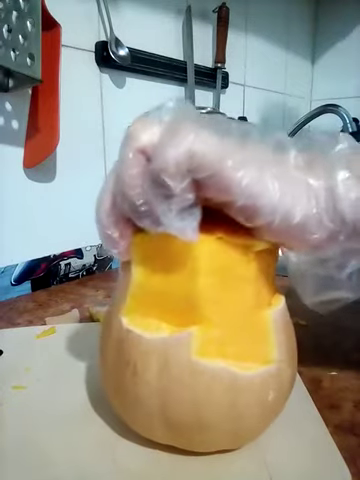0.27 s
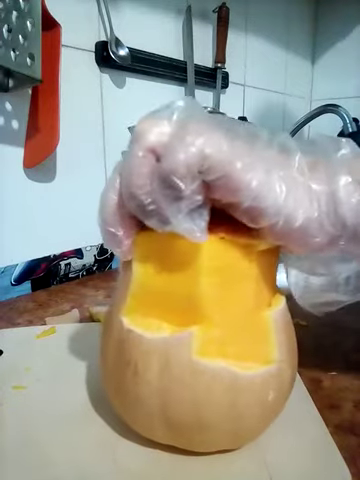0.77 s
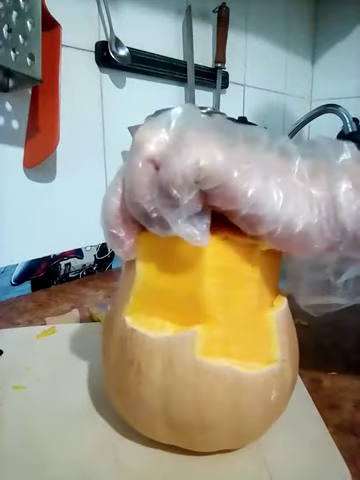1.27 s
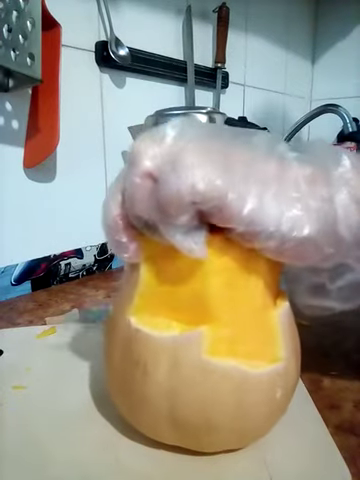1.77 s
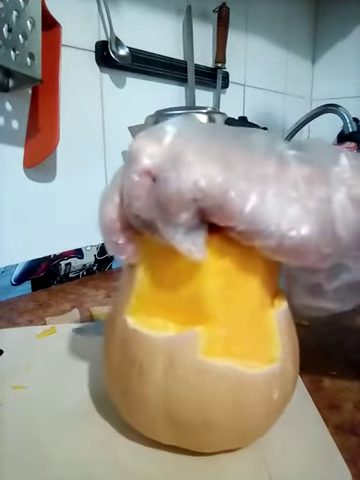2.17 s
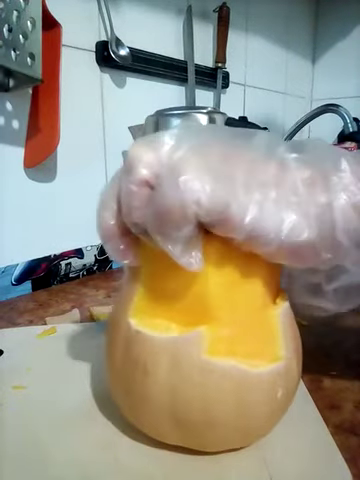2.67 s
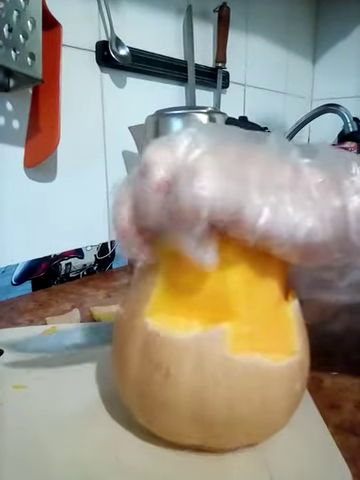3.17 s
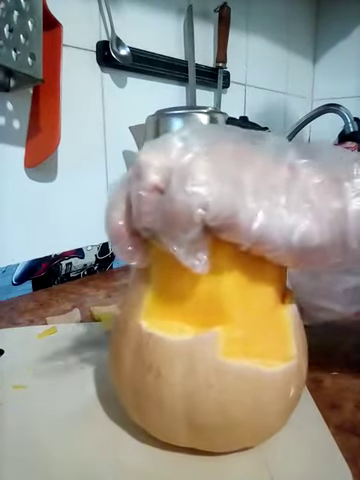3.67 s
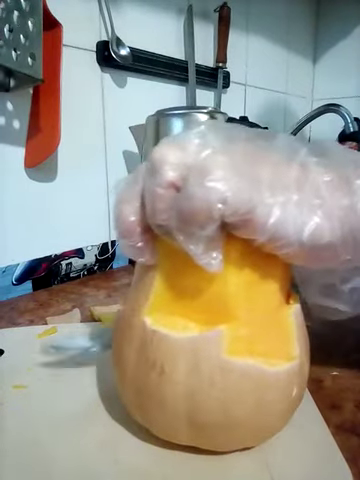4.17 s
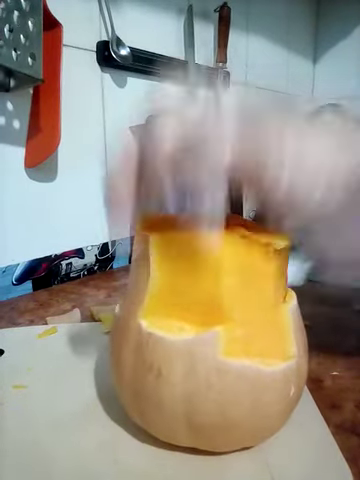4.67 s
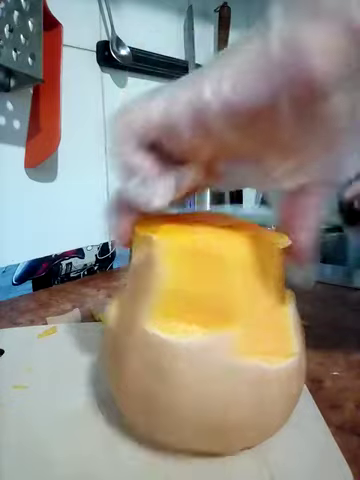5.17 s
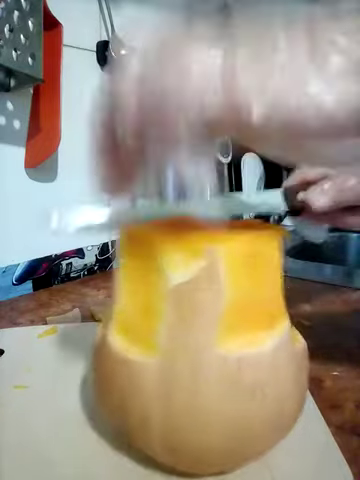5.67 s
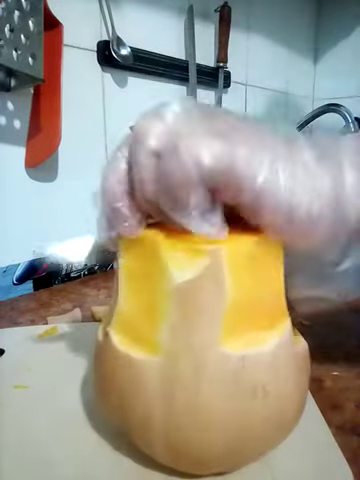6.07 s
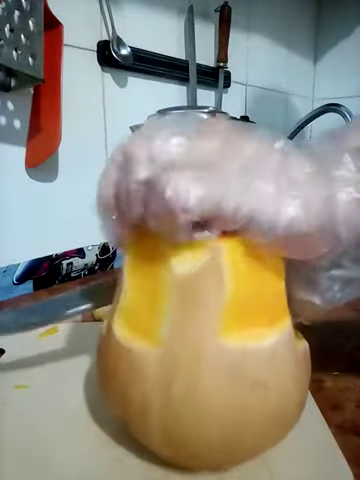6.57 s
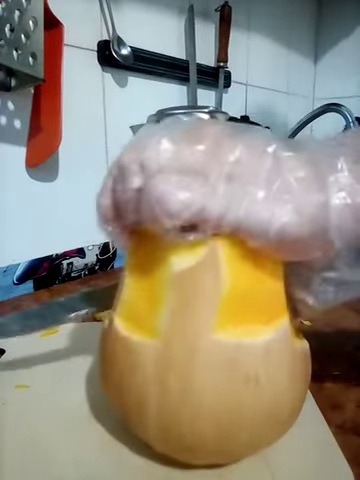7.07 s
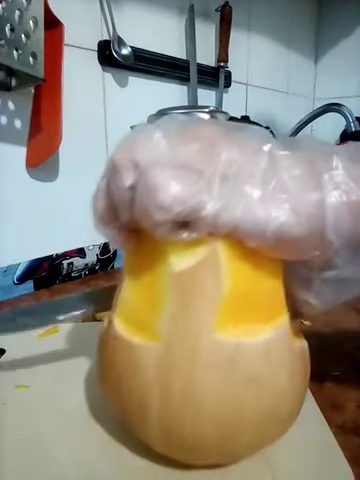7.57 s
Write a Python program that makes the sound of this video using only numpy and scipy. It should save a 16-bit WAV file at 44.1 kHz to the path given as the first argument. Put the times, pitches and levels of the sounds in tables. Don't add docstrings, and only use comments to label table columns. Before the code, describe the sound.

A quiet start of faint film crackle gives way to paring: dry rasps, hollow rubbing and bright plastic pops. Four snaps of tough peel punctuate the first half, the last two sharp and loud with a short tiled echo. Then glove rustle swells, with lighter scraping, small squeaks and soft counter bumps. Close, mid-bright phone sound, little deep bass, faint fridge hum beneath.

```python
import sys
import numpy as np
from scipy import signal
from scipy.fft import rfft, irfft, next_fast_len
from scipy.io import wavfile
from scipy.ndimage import uniform_filter1d, map_coordinates

SR = 44100
rng = np.random.default_rng(int(sys.argv[2]) if len(sys.argv) > 2 else 0)


def gain_from_db(level_db):
    decades = np.asarray(level_db, float) / 20
    return 10 ** decades


def output_pcm(signal):
    pcm = np.clip(np.atleast_2d(signal).T, -1, 1) * 32767
    wavfile.write(sys.argv[1], SR, np.round(pcm).astype(np.int16))


N = 347067


def unit(x):
    return x / np.sqrt(np.mean(x ** 2) + 1e-20)


def along(points, hz):
    f, v = np.transpose(points)
    return np.interp(np.log(hz + 1), np.log(f + 1), v)


def wobble(rate_hz):
    knots = rng.standard_normal(int(N * rate_hz / SR) + 4)
    return map_coordinates(knots, [np.arange(N) * rate_hz / SR])


def filtered(x, response):
    m = next_fast_len(len(x) + 8192)
    return irfft(rfft(x, m) * response(np.fft.rfftfreq(m, 1 / SR)), m)[:len(x)]


def causal(points):
    def response(hz):
        cepstrum = irfft(np.log(gain_from_db(along(points, hz)) + 1e-6))
        half = len(cepstrum) // 2
        cepstrum[1:half] *= 2
        cepstrum[half + 1:] = 0
        return np.exp(rfft(cepstrum))
    return response


def body(peaks):
    def response(f):
        total = 0
        for k, (hz, width_hz, db) in enumerate(peaks):
            loss = 1j * f * width_hz
            total = total + (-1) ** k * gain_from_db(db) * loss / (hz * hz - f * f + loss)
        return total
    return response


def ring(hz, t60_s, t, attack_s, drift_rad=0):
    return np.sin(2 * np.pi * hz * t + drift_rad) * gain_from_db(-60 * t / t60_s) * (1 - np.exp(-t / attack_s))


def grit(count, spread_db, life_s, clump_db, smooth_db):
    at, size = rng.random((count, 2)).T
    size = gain_from_db(-spread_db * np.log(size + 1 / 25))
    slips = np.bincount((at * N).astype(int), size, N)
    puffs = signal.lfilter([1], [1, -np.exp(-1 / (life_s * SR))], slips)
    return gain_from_db(clump_db * wobble(45)) * (unit(puffs) + gain_from_db(smooth_db)) * rng.standard_normal(N)


def patchy(x, focus=lambda hz, s: 1):
    hz, s, z = signal.stft(x, SR, nperseg=512)
    field = uniform_filter1d(rng.standard_normal(z.shape), size=6, axis=0)
    field = uniform_filter1d(field, size=9, axis=1)
    streaks = uniform_filter1d(rng.standard_normal(z.shape), size=14, axis=1)
    patch_db = 2.2 / (1 + (hz[:, None] / 8000) ** 4)
    gain = gain_from_db(patch_db * unit(field) + 2.2 * unit(streaks))
    return signal.istft(z * gain * focus(hz[:, None], s), nperseg=512)[1][:N]


def effort(s, rise_s, hold_s, db, fall_db_per_s):
    t = np.arange(N // 64 + 2) * 64 / SR - np.asarray(s)[:, None]
    early = np.minimum(t, 0) / np.reshape(rise_s, (-1, 1))
    late = np.maximum(t - hold_s[:, None], 0)
    power = gain_from_db(2 * (db[:, None] + 20 * early - fall_db_per_s * late)).sum(axis=0)
    return np.sqrt(np.interp(np.arange(N) / 64, np.arange(len(power)), power))


def add(track, s, sound):
    part = track[round(s * SR):][:len(sound)]
    part += sound[:len(part)]


# (time of full strength [s], rise [s], hold [s], level [dB])
SQUEEZES = [(0, .01, 0.05, -61), (0.188, 0.36, 0.074, -66), (0.427, 0.0089, 0.14, -67),
            (1.118, 0.083, 0.087, -54.5), (1.258, .006, 0.066, -54.5), (1.396, 0.039, 0.087, -53),
            (1.553, 0.038, 0.13, -52.5), (1.777, 0.036, 0.19, -57), (2.114, 0.084, 0.11, -51.5),
            (2.321, 0.0051, 0.032, -48.5), (2.457, 0.1, 0.051, -47), (2.667, 0.061, 0.02, -44),
            (2.888, 0.03, 0.11, -56.5), (3.073, 0.072, 0.1, -58), (3.234, .005, 0.057, -59),
            (3.55, 0.17, 0.22, -55.5), (3.882, 0.043, 0.2, -59.5), (4.279, .003, 0.022, -51),
            (4.547, 0.17, 0.021, -42.5), (4.926, 0.19, 0.015, -46), (5.03, 0.074, 0.12, -52.5),
            (5.194, .006, 0.09, -51.5), (5.39, .15, 0.23, -51.5), (5.638, .1, 0.14, -61),
            (5.823, 0.026, 0.3, -50), (6.181, 0.074, 0.11, -44.5), (6.414, 0.14, 0.03, -46.5),
            (6.514, 0.051, 0.012, -40), (6.687, 0.15, 0.026, -48.5), (6.74, .005, 0.023, -55.5),
            (6.836, 0.061, 0.066, -53), (7.022, 0.074, 0.18, -49), (7.318, 0.064, 0.56, -56),
            (7.579, 0.04, 0.026, -49), (7.643, .03, 0.091, -63), (7.782, .02, 0.027, -59.5)]


def hand_effort():
    return effort(*np.transpose(SQUEEZES), fall_db_per_s=175) + gain_from_db(-78)


# (frequency [Hz], density [dB per Hz])
GLOVE_COLOUR = [(1760, -32.5), (3000, -9.5), (4000, -11), (5710, 1.5), (6410, 3.5), (6820, -1.5),
                (6960, -3.5), (8200, -20.5), (14500, -30.5), (15400, -44)]
# (frequency [Hz], density [dB per Hz])
TICK_COLOUR = [(1500, -21), (3500, -11.5), (6000, -1.5), (7000, -2.5), (8200, -21), (11000, -29),
               (15400, -38)]


def glove(hand):
    slips = grit(count=2500, spread_db=5.5, life_s=0.00033, clump_db=1.5, smooth_db=7.0)
    rustle = filtered(patchy(slips), causal(GLOVE_COLOUR))
    ticks = grit(count=900, spread_db=1.8, life_s=0.0005, clump_db=1, smooth_db=-40)
    ticks = filtered(ticks, causal(TICK_COLOUR))
    return hand * (unit(rustle) + gain_from_db(-15) * unit(ticks))


# (time [s], peak [dB], pitch [Hz])
CREASES = [(0.1028, -27, 6750), (0.2194, -35.5, 6750), (0.245, -42, 6000), (0.4294, -33.5, 5460),
           (0.5367, -36, 6400), (0.9585, -44, 710), (1.2823, -23.5, 6470), (1.3598, -29, 6190),
           (1.5564, -26, 3300), (1.5928, -25, 3380), (1.768, -29, 5800), (1.8552, -41, 6060),
           (2.1106, -25, 5000), (2.4743, -32, 6430), (2.5885, -33, 5910), (2.6434, -39, 5820),
           (2.8823, -35, 6230), (2.97, -30.5, 6250), (3.241, -40, 6240), (3.6546, -50, 6660),
           (3.7239, -41, 6260), (4.1048, -38, 5630), (4.2777, -36, 4900), (4.9174, -21, 6200),
           (5.1314, -30, 6270), (5.218, -27, 6120), (5.4889, -32, 6160), (6.0766, -23, 6130),
           (6.3639, -29, 5800), (6.4777, -31, 6380), (6.6757, -26, 5640), (7.0254, -32, 5760),
           (7.2197, -24, 5700), (7.7283, -31, 5150), (4.358, -30, 620), (4.388, -16.5, 900),
           (4.459, -25, 840), (1.3125, -31, 3000), (1.146, -23.5, 6300), (1.248, -27, 6200),
           (1.265, -25, 6230), (1.312, -33.5, 1650), (1.392, -42, 5700), (1.4715, -30, 1650),
           (1.5416, -24, 5540), (1.556, -21, 5400), (1.5932, -17, 6100), (1.6452, -23.5, 5770),
           (2.3225, -27, 4420), (2.607, -26, 5660), (3.217, -29.5, 6340), (3.871, -35, 6600),
           (5.197, -27, 6200), (5.238, -22, 6000), (5.8202, -24.5, 6660), (6.3096, -25, 5570),
           (6.4063, -19, 6330), (6.73, -21, 6100), (7.003, -26, 6600), (7.121, -19, 6400),
           (7.198, -20, 6340), (7.4328, -35, 573), (7.7304, -35.5, 1900),
           (.074, -52, 4200), (.1028, -46, 3500), (.184, -47, 3500), (.2185, -53, 3100),
             (.245, -45, 3300), (.9585, -48, 2800), (.959, -47, 5500), (1.265, -37, 3400),
             (1.411, -37, 1300), (1.473, -38, 3300), (1.545, -37, 1000), (1.593, -33, 1500),
             (1.646, -31, 3400), (1.66, -38.5, 3200), (1.767, -34, 3300), (3.259, -34, 800),
             (4.279, -40, 3730), (4.28, -43, 1797), (6.401, -32, 3000), (6.86, -44, 1500),
             (7.685, -33, 1270), (7.73, -37.5, 690), (7.73, -40, 3200)]
# (frequency [Hz], gain [dB])
PORT = [(7000, 5), (8200, -18), (15500, -25.5)]


def creases():
    out, t = np.zeros(N), np.arange(1500) / SR
    for s, db, hz in CREASES:
        t60_s = 0.023 + 2.8 / hz
        spit = gain_from_db(-60 * t / t60_s) * rng.standard_normal(len(t))
        spit[0] = 7.5
        fold = body([(hz, 0.4 * hz, 0)])
        pop = filtered(spit, lambda f: fold(f) ** 2 * causal(PORT)(f))
        add(out, s, gain_from_db(db - 9.5) * pop / abs(pop).max())
    return out


# (time [s], treble peak [dB], pitch [Hz])
SPITS = [(0.0732, -64, 9260), (0.1022, -59, 7850), (0.1695, -66, 8370), (1.1832, -56, 9360),
         (1.2471, -54, 7820), (1.3982, -55, 8410), (1.5918, -51, 8660), (1.6302, -54, 8050),
         (1.7973, -59, 7800), (2.1071, -49, 8710), (2.3221, -52, 8790), (2.4638, -50, 10900),
         (3.1916, -54, 7800), (3.2161, -63, 7800), (3.2405, -59, 8850), (3.49, -54, 8250),
         (3.6546, -44, 8770), (3.682, -54, 8770), (3.7454, -60, 7850), (4.9, -47, 8610),
         (5.0744, -54, 7830), (5.8212, -47, 7820), (6.3071, -52, 8210), (6.4009, -51, 7810),
         (6.8199, -52, 8310), (7.002, -56, 8000), (7.1112, -58, 7870), (7.5911, -52, 8090)]
# (frequency [Hz], density [dB per Hz])
SPIT_COLOUR = [(800, -26), (3000, -5), (6000, 5), (7500, -1.5), (9000, 5.5), (12000, -9.5), (15400, -16)]


def spits():
    out, t = np.zeros(N), np.arange(800) / SR
    for s, db, hz in SPITS:
        puff = gain_from_db(-60 * t / 0.011) * rng.standard_normal(len(t))
        bump = body([(hz, 900, 0)])
        tick = filtered(puff, lambda f: causal(SPIT_COLOUR)(f) * (1 + bump(f)))
        add(out, s, gain_from_db(db + 1) * tick / abs(tick).max())
    return out


CUT_RISE_S, CUT_FALL_DB_PER_S = 0.043, 210
# (time [s], hold [s], rasp [dB], flesh over rasp [dB], pitch of rubbed hollow [Hz])
CUTS = [(0.434, 0.004, -80, 11, 450), (1.014, 0.33, -59.5, -0.5, 1500), (1.363, 0.14, -65, -7, 1540),
        (1.554, 0.054, -53, -14, 1530), (1.664, 0.25, -64, 2, 744), (1.898, 0.017, -44.5, 1.5, 1167),
        (2.078, 0.15, -53, -8.5, 1484), (2.303, 0.02, -56, -6.5, 1105), (2.494, 0.032, -56, -2, 1250),
        (2.653, 0.022, -56.5, -2.5, 1300), (2.802, 0.075, -73, 8.5, 1000), (3.108, 0.023, -66, 4, 1510),
        (3.89, 0.11, -62, -3.5, 830), (4.47, 0.12, -50.5, -12, 766), (4.902, 0.038, -53.5, -19, 790),
        (5.0, 0.77, -71.5, -8.5, 575), (5.886, 0.14, -57.5, 2.5, 1290), (6.067, 0.17, -50.5, -7, 1290),
        (6.378, .02, -62.5, -3.5, 1310), (6.52, 0.017, -52.5, -16, 1220), (6.68, 0.25, -73, 6.5, 1150),
        (7.028, 0.15, -59.5, -0.5, 1260), (7.406, 0.045, -62.5, -0.5, 706), (7.6, 0.19, -68, 1.5, 1980)]
# (frequency [Hz], level [dB])
RASP_COLOUR = [(1200, -13.5), (1900, -6.5), (2150, -1.5), (2550, -5), (3250, 0.5), (3900, 0.5),
               (4400, -2.5), (5500, 2.5), (8000, -25.5), (15500, -55)]
# (frequency [Hz], width [Hz], level [dB])
BLADE_MODES = [(1290, 70, -12), (1620, 80, -8), (2550, 77, -5.5), (3480, 76, -12)]


def blade_rasp(hand):
    s, hold_s, db, _, _ = np.transpose(CUTS)
    strength = effort(s, CUT_RISE_S, hold_s, db, CUT_FALL_DB_PER_S) + gain_from_db(-20) * hand
    slips = grit(count=2000, spread_db=3, life_s=0.0009, clump_db=1, smooth_db=9)
    rasp = filtered(patchy(slips), causal(RASP_COLOUR))
    rasp = filtered(rasp, lambda hz: 1 + sum(body([mode])(hz) for mode in BLADE_MODES))
    return strength * unit(rasp)


# (frequency [Hz], width [Hz], level [dB])
FLESH_MODES = [(452, 75, 3.5), (692, 180, 2.5), (920, 200, 2.5), (1237, 146, 4.5), (1577, 440, 2),
               (2210, 890, -3.5)]


def flesh_rub(hand):
    s, hold_s, db, depth_db, pitch_hz = np.transpose(CUTS)
    strength = effort(s, CUT_RISE_S, hold_s, db + depth_db, CUT_FALL_DB_PER_S) + gain_from_db(-17) * hand
    catch = np.clip(1 + wobble(14), 0, 2.5)

    def hollow(hz, t):
        current = np.maximum(np.searchsorted(s - CUT_RISE_S, t) - 1, 0)
        caught = np.interp(t * SR, np.arange(N), catch)
        return 1 + 0.45 * caught / (1 + ((hz - pitch_hz[current]) / 90) ** 2)

    slips = grit(count=1200, spread_db=0.5, life_s=0.0021, clump_db=4.0, smooth_db=16.5)
    return strength * unit(filtered(patchy(slips, hollow), body(FLESH_MODES)))


# (time [s], hold [s], level [dB], start pitch [Hz], end pitch [Hz])
SINGS = [(1.315, 0.034, -61, 1600, 1700), (1.425, 0.021, -59, 1600, 1600),
         (1.477, 0.032, -61.5, 1750, 1720), (1.546, 0.013, -53.5, 1500, 1450),
         (1.647, .05, -60.5, 1620, 1680), (2.657, 0.045, -58, 1500, 1400), (2.739, .15, -68, 1300, 880),
         (2.696, 0.075, -63, 5600, 5500), (3.119, 0.04, -66, 1400, 1500), (3.129, 0.038, -67, 1680, 1550),
         (3.547, 0.034, -67, 1850, 1850), (5.43, .2, -69, 3050, 3100), (6.507, 0.022, -58, 1303, 1280),
         (6.672, 0.056, -64, 1260, 1230), (6.69, 0.058, -64, 3500, 3200), (6.896, 0.024, -62, 500, 460),
         (7.038, 0.17, -68, 1310, 1370), (7.118, 0.065, -63, 3480, 3200), (7.356, 0.075, -64, 950, 1020),
         (7.48, .035, -65, 2550, 2440), (7.65, .06, -63, 1300, 1400), (7.739, .04, -72, 600, 600)]


def squeaks():
    out, t = np.zeros(N), np.arange(N) / SR
    blur_rad, flutter = 1.6 * wobble(160), gain_from_db(3 * wobble(40))
    for s, hold_s, db, hz, end_hz in SINGS:
        turns = np.cumsum(np.interp(t, [s, s + hold_s], [hz, end_hz])) / SR
        swell = effort([s], 0.024, np.array([hold_s]), np.array([db + 2.5]), CUT_FALL_DB_PER_S * 2)
        out += swell * np.sin(2 * np.pi * turns + blur_rad)
    return flutter * out


# (frequency [Hz], t60 [s])
TILES = [(150, 0.56), (1000, 0.44), (5000, 0.44), (12000, 0.039)]


def room(x):
    hz, t, z = signal.stft(rng.standard_normal(SR * 3 // 4), SR, nperseg=256)
    tail = signal.istft(z * gain_from_db(-60 * t / along(TILES, hz)[:, None]), SR, nperseg=256)[1]
    tail *= 1 - np.exp(-np.arange(len(tail)) / SR / 0.0094)
    return signal.fftconvolve(x, tail / np.linalg.norm(tail))


# (time [s], tear [dB], tear length [s], ring [dB], rise [s], room [dB])
SNAPS = [
    (1.009, -46, 0.12, -23, 0.0059, -0.5),
    (1.893, -28.5, 0.096, -21, 0.00084, -10),
    (3.274, -19, 0.33, -18.5, 0.00084, -11.5),
    (4.3, -19, 0.4, -22, 0.00094, -10),
]
SNAP_HOLD_S = [0.0045, 0.0013, 0.039, 0.0037]
TREBLE_HOLD_S = [.05, .05, 0.13, .07]
# (frequency [Hz], density [dB per Hz])
SNAP_COLOURS = [
    [(180, -41), (300, -11), (756, -34), (1180, -9), (1280, -30), (1910, 2), (2360, -3), (3870, -11),
     (4800, -22), (5660, 3), (8010, -38), (15500, -56)],
    [(180, -26), (300, 3.5), (1020, 9.5), (1180, 15), (1350, 8.5), (2690, 13), (4800, -4), (6680, -16),
     (15500, -82)],
    [(120, -62), (200, -35), (400, -21), (715, -17.5), (1050, -15), (1300, -14.5), (1540, -17), (4260, -12),
     (5910, 1.5), (8050, -23.5), (15500, -44)],
    [(150, -45), (200, -10), (240, -8), (380, -14), (600, -11), (850, -16.5), (1300, -15), (1950, -8),
     (2130, -9), (2450, -18.5), (3120, -9.5), (3600, -16.5), (4150, -8), (4800, -16.5), (5800, -6.5),
     (8200, -32.5), (11800, -53), (12300, -65), (14500, -59), (15500, -87)],
]
# (frequency [Hz], level [dB], t60 [s])
SNAP_MODES = [
    [(1900, 2.5, 0.024), (2170, -21, 0.096), (5640, 1, 0.022), (4140, -11, 0.039), (3830, -21, 0.12),
     (3050, -19, .06), (1920, -19, 0.16), (5670, -20.5, .2), (4600, -27.5, 0.1), (1250, -26, 0.063)],
    [(733, 10, 0.015), (1094, -7, 0.022), (2130, 1, 0.0099), (3480, 1, 0.0089), (4200, -8, 0.012),
     (5000, -12, 0.013), (1000, 0, 0.029)],
    [(608, -1, 0.07), (1000, -1, 0.043), (412, -20, 0.015), (800, -10, 0.037), (5050, -10, .2),
     (5180, -8, 0.26), (5400, -17, 0.22), (5450, -12, 0.3), (6030, -3, 0.32), (6340, -7.5, 0.31),
     (6250, -6.5, 0.22), (309, -14, 0.044)],
    [(583, 3, 0.03), (686, 10.5, 0.033), (994, 2.5, 0.11), (1857, -12.5, 0.11), (3220, 4, 0.032),
     (4080, 8, 0.036), (5330, 8.5, 0.016), (545, -12, 0.57), (680, -15, 0.68), (450, -22, 0.051),
     (1500, -11, 0.48), (2100, -16, 0.45), (4030, -6, 0.27), (5960, -11, 0.3)],
]


def snaps():
    out, t = np.zeros(N), np.arange(SR // 2) / SR
    events = zip(SNAPS, SNAP_HOLD_S, TREBLE_HOLD_S, SNAP_COLOURS, SNAP_MODES)
    for (s, db, length_s, ring_db, rise_s, room_db), hold_s, fine_s, colour, modes in events:
        noise = gain_from_db(wobble(250)[:len(t)]) * rng.standard_normal(len(t))
        fibres = unit(filtered(noise, causal(colour)))
        fine = filtered(fibres, lambda hz: 1 / (1 + (8000 / (hz + 1)) ** 12))
        fibres = fibres - fine * (1 - gain_from_db(-60 * np.maximum(t - fine_s, 0) / 0.2))
        fall = (np.maximum(t - hold_s, 0) / length_s) ** 1.023
        tear = fibres * gain_from_db(db - 60 * fall) * (1 - np.exp(-t / rise_s))
        walk = np.cumsum(rng.standard_normal((len(modes), len(t))), axis=1) * 0.6 / np.sqrt(0.012 * SR)
        walk = uniform_filter1d(walk, size=300, axis=1)
        knock = np.zeros(len(t))
        for (hz, level_db, t60_s), drift_rad in zip(modes, walk):
            knock += gain_from_db(ring_db + level_db) * ring(hz, t60_s, t, rise_s, drift_rad)
        add(out, s, tear + knock)
        add(out, s, gain_from_db(room_db) * room(tear + 0.23 * knock))
    return out


# (time [s], peak [dB], pitch [Hz], t60 [s], deep counter mode [dB])
THUDS = [(0.434, -34, 158, 0.07, 3), (1.021, -40, 179, 0.12, -13), (1.642, -41, 153.6, 0.17, -20),
         (1.945, -28, 152, 0.073, -21), (2.163, -43, 141, 0.13, -13), (2.479, -39, 255, 0.24, -19),
         (2.492, -24, 147.5, 0.15, -18), (3.103, -40.5, 102, 0.17, 8), (3.276, -18, 246, 0.061, -36),
         (3.873, -24, 174, 0.11, -5), (4.304, -9, 242, 0.096, -48), (4.482, -38, 247.6, 0.44, -26),
         (5.509, -45, 187, 0.13, -12), (6.531, -39, 152, 0.097, 2), (7.106, -36, 179, 0.15, 7),
         (7.265, -38, 165.2, 0.26, -7), (7.661, -37, 98, 0.32, 0), (7.82, -32.5, 164, 0.13, -9)]


def thuds():
    out, t = np.zeros(N), np.arange(SR // 2) / SR
    for s, db, hz, t60_s, deep_db in THUDS:
        deep = 0.48 * ring(97, t60_s, t, 0.0074) + ring(58, 2.0 * t60_s, t, 0.0075)
        top = ring(hz, t60_s, t, 0.0019) + 0.21 * ring(2.1 * hz, 0.5 * t60_s, t, 0.0014)
        add(out, s, gain_from_db(db - 7.0) * (top + gain_from_db(deep_db) * deep))
    return out


# (time [s], hold [s], level [dB])
ROCKS = [(0.448, 0.044, -62), (0.996, 0.14, -59), (1.194, 0.37, -65), (1.65, .03, -61), (1.912, 0.041, -42),
         (2.164, 0.087, -50), (2.33, 0.048, -60.5), (2.498, 0.0093, -36.5), (2.707, 0.038, -55.5),
         (3.109, 0.025, -54), (3.28, 0.029, -42), (3.891, 0.017, -43), (4.288, 0.17, -55),
         (4.892, 0.49, -72), (5.518, 0.041, -53), (5.62, 0.034, -48), (5.73, 0.456, -59.5),
         (6.372, 0.042, -60.5), (6.53, 0.2, -56), (6.884, 0.027, -58), (7.072, 0.13, -54.5),
         (7.272, 0.068, -58.5), (7.432, 0.048, -61.5), (7.62, 0.12, -51.5), (7.832, .05, -48)]
# (frequency [Hz], width [Hz], level [dB])
COUNTER_MODES = [(52.9, 27, 0), (98.4, 22.5, 2), (164, 48, 2), (268, 160, -6)]


def counter_rumble():
    s, hold_s, db = np.transpose(ROCKS)
    rocking = effort(s, 0.024, hold_s, db, fall_db_per_s=212)
    slips = grit(count=400, spread_db=0, life_s=0.0042, clump_db=2.5, smooth_db=7)
    rumble = filtered(slips, body(COUNTER_MODES))
    rumble = filtered(rumble, lambda hz: 1 / (1 + 1j * hz / 350) ** 2)
    return rocking * unit(rumble)


# (frequency [Hz], density [dB per Hz])
AIR_COLOUR = [(15, -82), (25, -37), (69, -14), (79, -30), (101, -2), (126, -22), (253, -20), (378, -21),
              (421, -19.5), (537, -25.5), (997, -30.5), (6050, -39), (8130, -47.5), (15500, -52)]
# (frequency [Hz], level [dB rms])
HUM = [(96.9, -79), (150.7, -77.5), (306.8, -83), (457.6, -85)]
# (frequency [Hz], level [dB], t60 [s])
TAP = [(1790, -70.5, 1.6), (3050, -63, 0.15)]


def kitchen():
    t = np.arange(N) / SR
    air = unit(filtered(rng.standard_normal(N), lambda hz: gain_from_db(along(AIR_COLOUR, hz))))
    out = gain_from_db(-66 + 0.21 * wobble(0.7)) * air
    for hz, db in HUM:
        out += gain_from_db(db + 5 + 3 * wobble(8)) * np.sin(2 * np.pi * hz * t + 0.8 * wobble(9))
    for hz, db, t60_s in TAP:
        out += gain_from_db(db + 1.5 * wobble(25)) * ring(hz, t60_s, t, 0.001)
    return out


def scene():
    hand = hand_effort()
    near = glove(hand) + blade_rasp(hand) + flesh_rub(hand) + creases() + squeaks()
    near_room = gain_from_db(-13.0) * room(near)[:N]
    return (near + near_room + spits() + snaps() + thuds() + counter_rumble() + kitchen())[None]


def low_pass(x):
    return signal.sosfilt(signal.butter(12, 16290, fs=SR, output="sos"), x)


def record(dry):
    bass = lambda hz: (1j * hz / (40 + 1j * hz)) ** 4
    kept = filtered(dry[0], lambda hz: bass(hz) * np.where(hz < 15500, 1, gain_from_db(-19.0)))[None]
    return low_pass(kept)


dry = scene()
out = record(dry)
output_pcm(out)
```